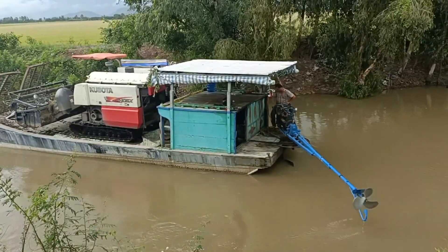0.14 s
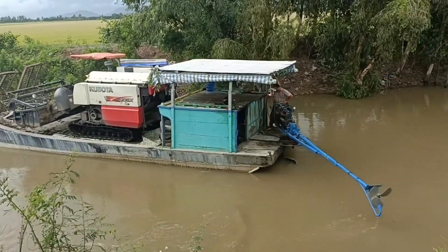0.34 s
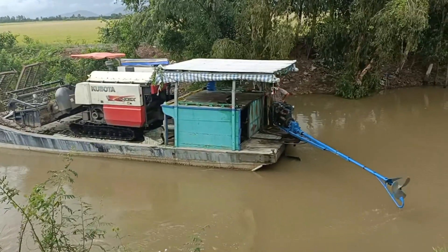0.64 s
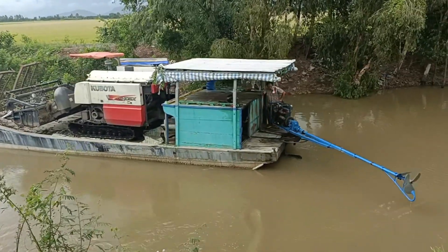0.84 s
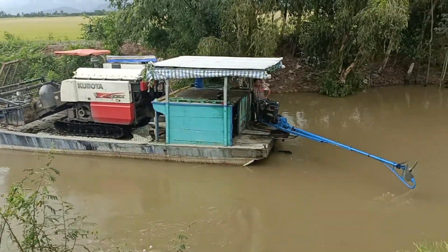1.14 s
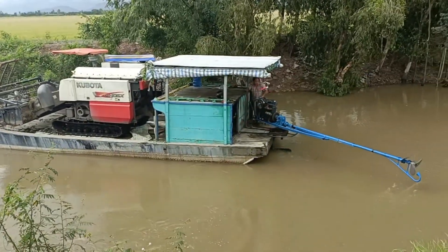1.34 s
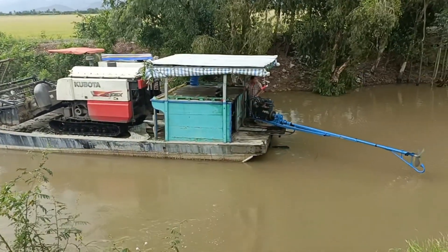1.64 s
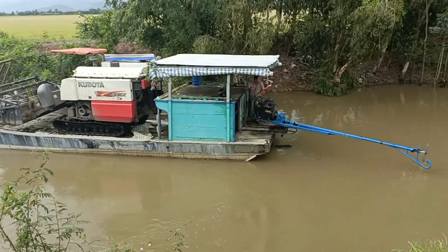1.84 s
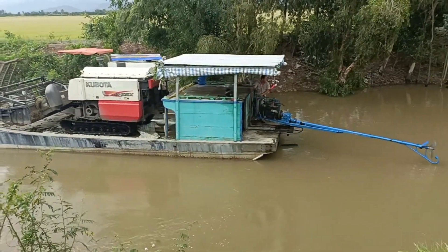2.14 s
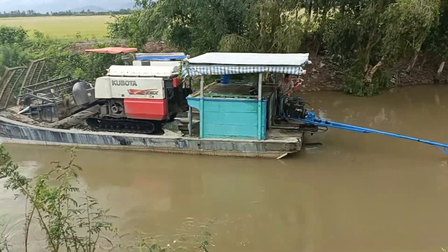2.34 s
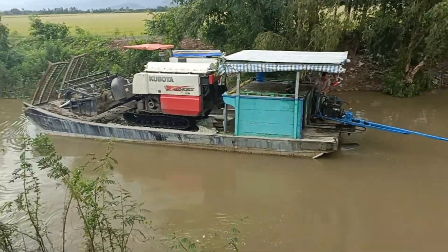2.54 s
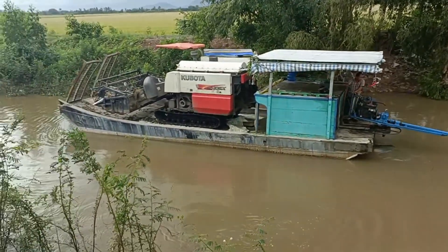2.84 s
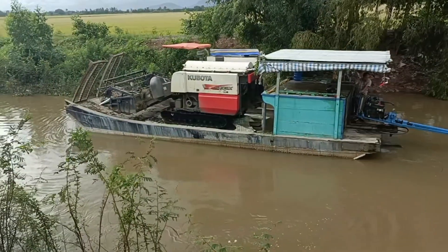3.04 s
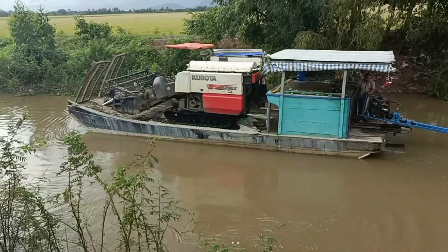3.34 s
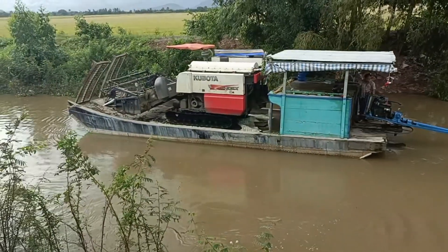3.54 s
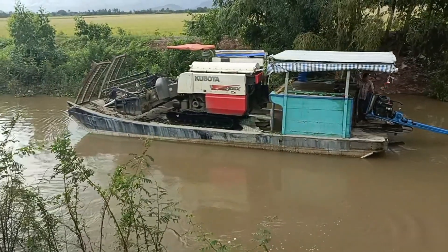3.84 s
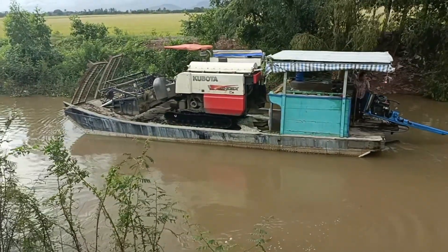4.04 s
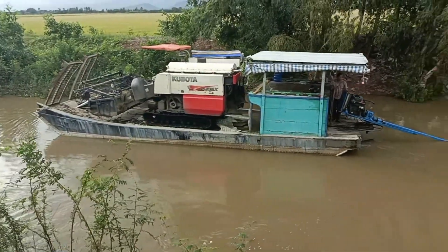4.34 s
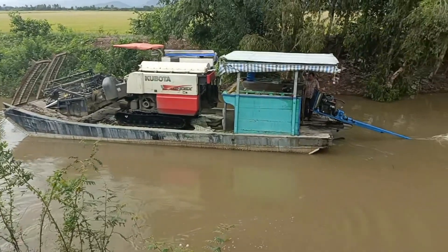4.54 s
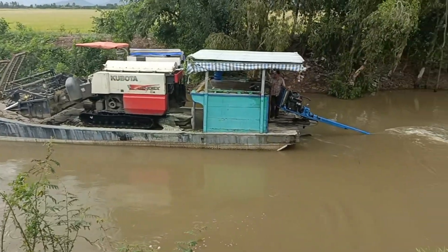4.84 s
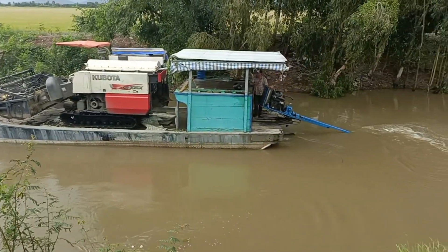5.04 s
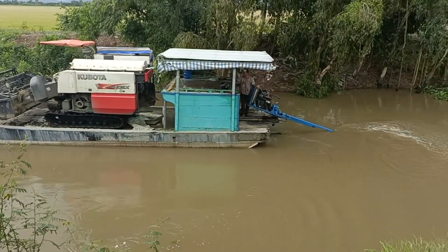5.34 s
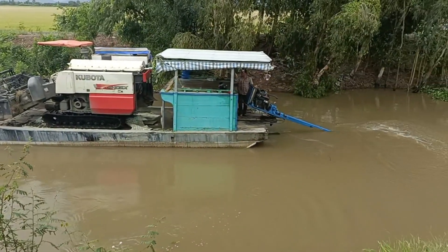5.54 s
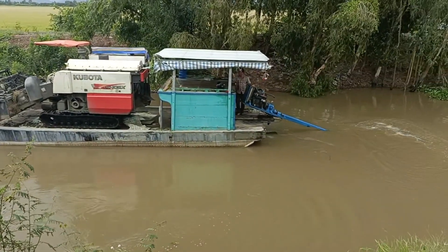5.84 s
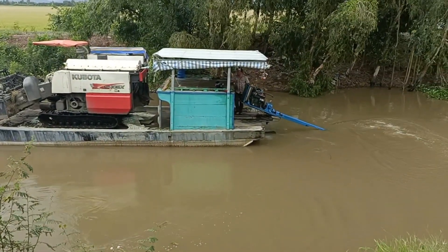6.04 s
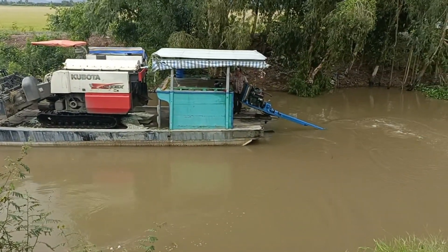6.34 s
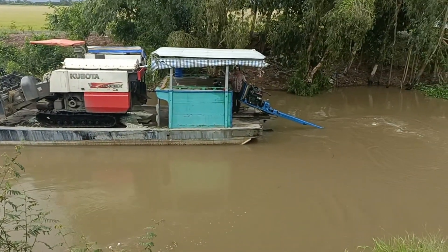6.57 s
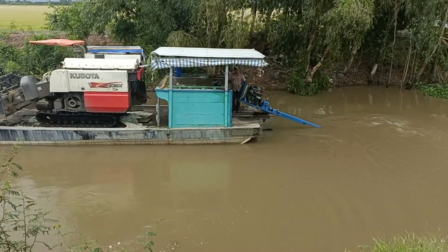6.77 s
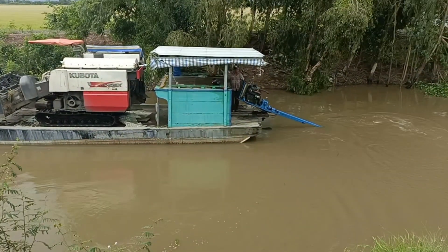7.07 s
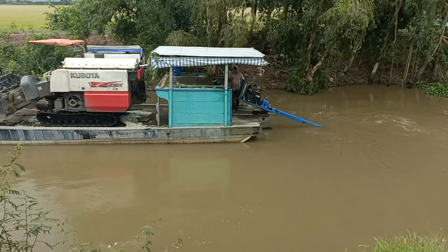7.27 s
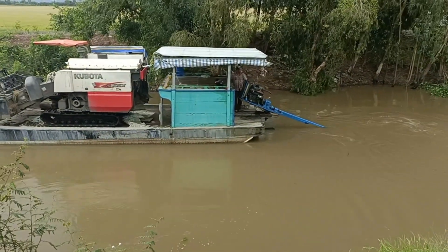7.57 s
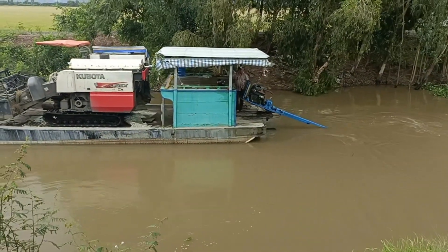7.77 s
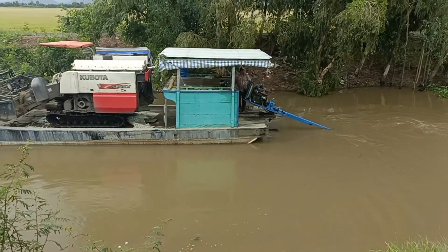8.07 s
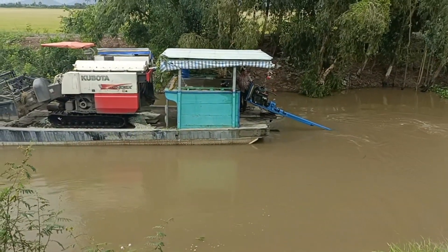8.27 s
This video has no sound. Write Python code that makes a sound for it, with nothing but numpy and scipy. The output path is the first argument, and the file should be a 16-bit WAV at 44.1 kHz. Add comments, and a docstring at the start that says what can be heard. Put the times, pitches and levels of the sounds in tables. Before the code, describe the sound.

From the start, low wind rumble and roar buffet the microphone on a canal bank, far heavier on the right. Beneath it a single-cylinder boat motor clatters at nearly forty firings a second, dropping by 0.6 s to about twenty-seven and sagging slowly to twenty-two near 4.4 s. Short bouts of loose steel clanks, each a few milliseconds of chattering, jangling contact, recur every 0.3 to 0.5 s. Dry swivel rasps over a hollow groan come at 2.0 to 2.8 s, then at 4.85 and 7.0 s. From 4 s the clanks are harder and brighter. Wind puffs slap at about 3.2, 3.5, 4.1, 4.9 and 7.2 s. Wind eases from 5.9 s, surges around 7.3 to 7.7 s, then drops. The engine speeds up from 7 s, peaking near 7.8 s amid the strongest clanking, and clatters on to 8.4 s. Leaves hiss faintly; the banks add short echoes.

```python
"""A rapid engine clatter with bouts of steel clanks: a long-tail motor pushes a barge along a windy canal.
The single cylinder fires 22 to 39 times a second: each firing swells shaped noise and rings the casing.
Loose steel on the mount clanks once a firing within a bout, as chattering noise through damped modes.
The swivel grates as the shaft swings round: short rasps of noise over a hollow groan.
Turbulence buffets two microphone ports on the bank, mostly the right; slaps and leaf hiss fill in."""
import sys
import numpy as np
from scipy import signal
from scipy.fft import rfft, irfft, next_fast_len
from scipy.io import wavfile
from scipy.ndimage import uniform_filter1d

SR = 44100
rng = np.random.default_rng(int(sys.argv[2]) if len(sys.argv) > 2 else 0)


def persist_wave(psi):
    """Save psi, clipped to +-1, as 16-bit WAV."""
    counts = np.round(np.clip(psi, -1, 1) * 32767).astype(np.int16)
    wavfile.write(sys.argv[1], SR, np.atleast_2d(counts).T)


N = 370881
TIME = np.arange(N) / SR  # s


# Engine speed: t/s, firing rate/Hz
ENGINE_SPEED = [(0, 38.6), (.23, 38), (.6, 27.5), (.9, 26.3), (2.8, 25.8), (3.2, 24), (3.6, 23),
                (4.4, 22.3), (4.85, 23), (5.5, 23.8), (5.95, 22.4), (6.85, 23.3), (7.02, 26.5),
                (7.35, 26.2), (7.63, 28.6), (7.81, 35.5), (8.13, 31.8), (8.41, 31.7)]


def firings():
    """Engine speed in firings per second, and its running sum: the count of firings so far."""
    speed, = curves(ENGINE_SPEED)
    return speed, np.cumsum(speed) / SR


# Running clatter of the engine before its swells: t/s, level/dB
RUNNING_LEVEL = [(0, -35.5), (.75, -34.5), (.84, -28.5), (1.85, -28.5), (2.07, -23), (2.79, -29),
                 (2.94, -33.5), (3.9, -32.5), (4.02, -28.5), (4.55, -30), (4.8, -27.5), (5.61, -26.5),
                 (5.9, -33.5), (6.35, -30.5), (6.78, -33.5), (7.7, -30.5), (8.41, -35.5)]


def shaking(swell_db=2.5, swell_s=0.077):
    """Running level in dB: the shaking swells around every bout of clanks and eases between them."""
    swells = [np.exp(-((TIME - bout[0]) / swell_s) ** 2) for bout in CLANK_BOUTS]
    return curves(RUNNING_LEVEL)[0] + swell_db * (np.max(swells, axis=0) - .5)


# Spectrum of the clatter: f/Hz, level/dB
CLATTER_SPECTRUM = [(40, -13), (70, 21), (130, -4.5), (280, 7), (650, -0.5), (1050, 5.5), (1300, -4.5),
                    (1600, -2), (2350, -4.5), (2900, -9), (5000, -7.5), (7300, -14.5), (9000, -27),
                    (15000, -29)]
# Modes of the engine casing: f/Hz, width/Hz, left level/dB, right level/dB
CASING_RINGS = [(1034, 110, 16, 0), (2300, 390, 20, 12), (3120, 110, 10, -62), (4750, 50, 5, -2)]


def engine(clatter_db=-1, tick=0.59, tick_turns=0.12, tick_at=0.23, likeness=0.37, casing_db=-6,
           casing_db_per_hz=0.76, turning_db_per_s=0.76, waver_db=1):
    """Valve gear and exhaust clatter all the time as noise, with a sharp swell at every firing."""
    speed, turns = firings()
    level_db = shaking() + waver_db * wander(60)
    from_firing = (turns - tick_at + .5) % 1 - .5
    strength = rng.uniform(.5, 1.5, 1000)[np.round(turns).astype(int)]
    pulses = 1 + tick * strength * np.exp(-(from_firing / tick_turns) ** 2)
    force = evened(pulses) * amp(level_db)
    clatter = coloured(noise_pair(likeness) * force, CLATTER_SPECTRUM)
    clatter = at_level(clatter, force) * amp([[4.5], [2.5]])
    # the casing rings harder at speed, and as the stern turns towards the bank
    faster_db = casing_db_per_hz * (speed - np.mean(speed))
    turning_db = turning_db_per_s * (TIME - np.mean(TIME))
    shake = force * amp(faster_db + turning_db)
    casing = at_level(ring(shake * rng.standard_normal(N), CASING_RINGS), shake)
    return amp(clatter_db) * clatter + amp(casing_db) * casing


# Bouts of clanking, one clank to a firing: t/s of the hardest clank, level/dB,
# build-up/firings, die-away/firings, low ring over the clash/dB
CLANK_BOUTS = [(.248, -28, 1.55, .4, 3), (0.603, -29.5, 1.7, 0.6, 0), (0.921, -26, 2, .55, -2),
               (1.278, -26.5, 1.3, 2, 1), (1.671, -23, 1.2, 0.99, -1.5), (2.397, -28, 1.6, 2.9, -14),
               (2.804, -20, 0.84, 0.86, -9), (3.186, -26, 1.2, 1.6, -28), (3.659, -23.5, 2.35, 0.53, -28),
               (4.027, -17, 1.52, 1.44, -6), (4.375, -18, 0.77, 1.5, -4), (4.753, -20.5, 1.56, 1.6, -0.5),
               (4.927, -22.5, 1.6, 1.15, -2), (5.272, -20, 2.15, 1.24, 0), (5.571, -20.5, 1.93, 1.84, 4),
               (5.927, -22, 1, 1.83, -3), (6.332, -21.5, 1.57, 0.8, -0.5), (6.44, -27.5, .4, 0.85, -6),
               (6.538, -20.5, 0.32, 0.41, -14), (6.691, -26.5, 2.5, 0.84, -0.5),
               (6.988, -16.5, 2.76, 2.1, -4), (7.448, -18, 3, 2.14, -3), (7.756, -14, 3.32, 3.2, -2),
               (8.112, -20.5, 1.65, 0.81, 4), (8.239, -23, 1.8, 1.7, -4), (8.398, -14.5, 1.88, 1.1, -3.5)]


def clank_blows(count=5, edge_db=-5.5, power=2.73, clank_scatter_db=2, ring_scatter_db=2.5):
    """Loose steel strikes once a firing, hardest mid-bout: rows of t/s, level/dB, low ring/dB."""
    _, turns = firings()
    steps = np.arange(-count, count + 1)  # firings away from the hardest clank
    blows = []
    for s, peak_db, build, fade, low_db in CLANK_BOUTS:
        times = np.interp(np.interp(s, TIME, turns) + steps, turns, TIME)
        # at a reach of 1 the bout is down by edge_db, and it keeps falling beyond
        reach = abs(steps) / np.where(steps < 0, build, fade)
        luck, ring_luck = rng.standard_normal((2, len(steps)))
        level_db = peak_db + edge_db * reach ** power + clank_scatter_db * luck
        blows.extend(np.transpose([times, level_db, low_db + ring_scatter_db * ring_luck]))
    return np.array(blows)


def struck_noise(order=2048, ripple_db=4.5, ripple_hz=330, likeness=0.29):
    """Contact noise in two channels, coloured by the spot that this one blow happens to hit."""
    hz = np.fft.rfftfreq(order, 1 / SR)
    bumps = np.clip(rng.standard_normal(400), -2, 2)
    ripple = np.interp(hz / ripple_hz, np.arange(400), bumps)
    return irfft(rfft(noise_pair(likeness, order)) * evened(amp(ripple_db * ripple)))


# Broad clash of a clank: f/Hz, left level/dB, right level/dB
CLASH_SPECTRUM = [(900, -37, -4), (1600, -0.5, 0), (2230, 1, 6), (2920, 11, -6), (3110, 12.5, -38),
                  (3920, 4, 12), (4370, -2, -19), (5280, 4.5, -2), (6250, -21, -49), (6740, -18, -3),
                  (10000, -7.5, -7.5), (12700, -5, -6.5), (15900, -13, -26)]
# Loose parts, low steel and a small bright part: f/Hz, width/Hz, left level/dB, right level/dB
PART_RINGS = [(2632, 38, 2.5, -8), (3157, 43, -3, -3), (3760, 110, 4.5, 4), (4195, 73, -3, -8),
              (4550, 140, -1, -2.5), (4860, 61, -8, -1), (5180, 150, -18, 0), (5400, 110, -20, -6),
              (6050, 150, -3.5, -19), (6520, 110, -4, -19)]
LOW_RINGS = [(2320, 117, -16, -14)]
HIGH_RINGS = [(6940, 290, -2, -32), (7420, 1060, 16.5, 0), (8500, 290, -6, -5.5)]
# How loosely the small bright part sits, as its ring in a clank: t/s, level/dB
BRIGHT_LOOSENESS = [(0, -31.5), (1.7, -34), (3.2, -23.5), (4.4, -28.5), (5.2, -30.5), (6.9, -29.5),
                    (7.8, -34.5), (8.1, -27), (8.4, -36)]


def clanks(rise_s=0.00094, chatter_s=0.0081, fall_s=0.0032, lead_s=0.00039, ring_lead_s=0.001, clash_db=1,
           parts_db=1, low_db=1.0, high_db=2, high_follow=0.64, usual_db=-23.5):
    """Each clank is a few milliseconds of chattering contact: a broad clash plus ringing modes."""
    clash, low, high = np.zeros((3, N))
    contacts = np.zeros((2, N))
    parts = np.zeros((len(PART_RINGS), N))
    blows = clank_blows()
    mixes = rng.exponential(1, (len(blows), len(PART_RINGS)))  # every clank strikes the parts differently
    loose_db, = curves(BRIGHT_LOOSENESS)

    def contact(t):
        """Smooth onset and release of the chatter."""
        return 1 / (1 + np.exp(-t / rise_s)) / (1 + np.exp((t - chatter_s) / fall_s))

    def sing(force, modes):
        """Modes fed evenly by the chatter, so that the ring follows the force of the blow."""
        grain = steadied(ring(rng.standard_normal(N), modes).sum(0), 0.0053)
        return at_level(ring(force * grain, modes), force)

    for (s, db, low_over_db), mix in zip(blows, mixes):
        if s >= TIME[-1]:
            continue
        near = slice(int((s - .01) * SR), int((s + .035) * SR))
        t = TIME[near] - s + lead_s
        press = amp(db) * contact(t)
        blow = contact(t + ring_lead_s)
        clash[near] += press
        contacts[:, near] += press * struck_noise()[:, :len(t)]
        parts[:, near] += amp(db) * evened(mix)[:, None] * blow
        low[near] += amp(db + low_over_db) * blow
        # the small part follows its seating, and only partly the blow
        high[near] += amp(loose_db[near] + high_follow * (db - usual_db)) * blow
    broad = at_level(coloured(contacts, CLASH_SPECTRUM), clash)
    rings = [ring(force * rng.standard_normal(N), [mode]) for force, mode in zip(parts, PART_RINGS)]
    jangle = at_level(sum(rings), clash)
    struck = amp(clash_db) * broad + amp(parts_db) * jangle
    return struck + amp(low_db) * sing(low, LOW_RINGS) + amp(high_db) * sing(high, HIGH_RINGS)


def light_rattle(rattle_db=-5, spread_db=4, rattle_at=0.19, rattle_turns=0.073):
    """Beneath the loud clanks, every firing jogs the loose parts a little and rings their modes."""
    turns = firings()[1] - rattle_at
    firing = np.round(turns).astype(int)
    jog = np.exp(-((turns - firing) / rattle_turns) ** 2) * amp(shaking())
    modes = [*LOW_RINGS, *PART_RINGS]
    luck = np.clip(rng.standard_normal((len(modes), firing.max() + 2)), -2, 2)
    sizes = amp(spread_db * luck)  # one per mode and firing
    rattle = sum(ring(jog * size[firing] * rng.standard_normal(N), [mode]) for size, mode in zip(sizes, modes))
    return amp(rattle_db) * at_level(rattle, jog)


# Grates of the swivel: t/s at the middle, level/dB, length/s
SWIVEL_GRATES = [(2.036, -20, 0.021), (2.182, -22, 0.031), (2.276, -17, 0.019), (2.684, -17, 0.012),
                 (2.755, -21, 0.032), (4.853, -21.5, 0.046), (6.979, -22.5, 0.023)]


def swivel(grate_db=0, grain_db=2, groan_db=-7, groan_hz=820, groan_width_hz=130, groan_stretch=3):
    """Dry steel slips: short grainy rasps over a longer hollow groan."""
    def strokes(stretch):
        return sum(amp(db) * np.exp(-(2 * (TIME - s) / (stretch * length)) ** 2)
                   for s, db, length in SWIVEL_GRATES)

    force, strain = strokes(1), strokes(groan_stretch)
    slips = force * amp(grain_db * wander(800)) * noise_pair(0.2)
    # f/Hz, level/dB
    rasp = coloured(slips, [(500, -53), (1800, 8), (3000, 3.0), (5000, 4), (8000, -5.5), (10000, -13.5),
                            (15000, -22)])
    groan = ring(strain * rng.standard_normal(N), [(groan_hz, groan_width_hz, 0, -3)])
    return amp(grate_db) * at_level(rasp, force) + amp(groan_db) * at_level(groan, strain)


def banks(x, wet_db=-9, t60=0.25, delay_s=0.0042):
    """Hull, cabin and wooded banks scatter a short tail of sparse, decaying echoes."""
    t = np.arange(SR // 3) / SR
    taps = rng.standard_normal((2, len(t))) * (rng.random((2, len(t))) < .1)
    tail = taps * amp(-60 * t / t60) * np.clip(t / delay_s - .5, 0, 1)
    tail /= np.linalg.norm(tail, axis=1, keepdims=True)
    return x + amp(wet_db) * signal.fftconvolve(x, tail, axes=1)[:, :N]


# Phase between the two ports for sound from the boat: f/Hz, lead of the left/rad
PORT_LEAD = [(2450, 0.4), (3400, -2), (4500, -1.5), (7200, -6), (9000, -4), (16000, -8.5)]


def ports(x):
    """Sound from the boat bends round the microphone body, shifting phase between the ports by frequency."""
    size = next_fast_len(N + 1000)
    lead = np.interp(np.fft.rfftfreq(size, 1 / SR), *np.transpose(PORT_LEAD))
    return irfft(rfft(x, size) * np.exp(.5j * np.array([lead, -lead])), size)[:, :N]


# Slow breeze on the sheltered left port and the windward right port: t/s, level/dB
LEFT_BREEZE = [(0, -33.5), (.7, -25), (.85, -19), (1.25, -21.5), (1.7, -17), (2.42, -15.5), (2.65, -22),
               (3.84, -24.5), (4, -16), (4.38, -19.5), (4.62, -29), (4.9, -21), (5.55, -21), (6.3, -37),
               (7.5, -26), (8.41, -29.5)]
RIGHT_BREEZE = [(0, -8), (.3, -10), (.75, -6), (2.45, -8.5), (2.6, -11.5), (3.15, -8), (3.55, -10),
                (3.95, -6.5), (5.7, -8.5), (5.9, -16), (6.42, -13), (6.65, -20.5), (7.05, -19),
                (7.35, -8.5), (7.72, -10.5), (8, -25.5), (8.41, -17.5)]
# Brief gusts and lulls on top: t/s at the middle, half length/s, left change/dB, right change/dB
BRIEF_GUSTS = [(0.179, .035, 12, -0.5), (0.423, 0.096, 12.5, -2), (0.65, .03, -3, -6),
               (2.738, 0.052, 1, -6.5), (3.78, 0.039, -9, -12), (6.135, .03, 24.5, 2.5),
               (6.763, 0.023, -3, -11), (6.959, 0.026, 5, 8.5), (7.22, 0.036, 4, 7), (7.5, 0.051, 0, -5),
               (7.603, 0.057, 5, 2.5), (8.273, 0.036, 21, 1)]


def breeze():
    """Wind level in dB at the left and right port: the slow breeze plus its gusts and lulls."""
    slow = np.array(curves(LEFT_BREEZE) + curves(RIGHT_BREEZE))
    return slow + sum(np.array([[left_db], [right_db]]) * np.exp(-((TIME - s) / length) ** 2)
                      for s, length, left_db, right_db in BRIEF_GUSTS)


# Spectrum of the buffeting: f/Hz, left level/dB, right level/dB
BUFFET_SPECTRUM = [(15, -37, -32), (35, -7, -33), (65, -7, -15), (103, 3.5, -5.5), (183, -5.5, -5),
                   (283.4, -2.5, 4.5), (385, -13.5, -5.5), (753, -24, -25), (1140, -29, -34),
                   (4850, -59, -119)]
# Eddies at the windward port, relative to the body of the wind: t/s, rumble level/dB, roar level/dB
EDDY_SIZES = [(0, -11, -11), (.57, -8, -18), (.75, -4.5, -1.5), (1.15, -11, -6), (2.4, 1.5, -5.5),
              (2.62, 0.5, -12.5), (3.5, -6.5, -9.5), (4.35, 0.5, -11.5), (5.2, -11.5, -9), (5.7, -7.5, -10),
              (6.55, 1.5, -13.5), (7.3, -6.5, -10), (8.41, -3, -13)]


def wind(rumble_hz=170, roar_hz=400, left_db=1.0, right_db=0, lump_db=2.0, body_lump_db=3.5,
         roar_lump_db=3.0, steady_s=.035, gust_roar=0.56, lump_more_db=1.0, lump_more_per_db=0.1461,
         full_db=-7):
    """Unrelated turbulence at each port; at the windward one it shifts between rumble and roar."""
    left, right = coloured(rng.standard_normal((2, N)), BUFFET_SPECTRUM)
    rumble_db, roar_db = curves(EDDY_SIZES)
    rumble = signal.sosfiltfilt(signal.butter(6, rumble_hz, fs=SR, output="sos"), right)
    roar = signal.sosfiltfilt(signal.butter(6, roar_hz, "high", fs=SR, output="sos"), right)
    lee_db, gust_db = breeze()
    # quieter wind is lumpier, loud wind is held flatter by the microphone's limiting
    lump_more = lump_more_db + lump_more_per_db * np.maximum(full_db - gust_db, 0)
    gust_db = gust_db + lump_more * wander(22)
    # a gust that stands out from the half second around it is brighter too
    roar_db = roar_db + gust_roar * (gust_db - uniform_filter1d(gust_db, SR // 2))
    # body and roar come and go on their own
    body = evened((right - rumble - roar) * amp(body_lump_db * wander(18)))
    roar = evened(roar * amp(roar_lump_db * wander(35)))
    right = body + amp(rumble_db) * evened(rumble) + amp(roar_db) * roar
    lee = steadied(left, 0.027) * amp(lee_db + left_db + lump_db * wander(25))
    windward = steadied(right, steady_s) * amp(gust_db + right_db)
    return np.array([lee, windward])


# Sharp gusts that slap a port: t/s, left level/dB, right level/dB
PORT_SLAPS = [(.42, -30, -50), (3.175, -42, -14), (3.51, -45, -17.5), (4.148, -34, -12.5), (4.88, -24, -16),
              (6.138, -31, -50), (7.245, -47, -18), (7.615, -47.5, -25)]


def slaps(length_s=0.015, slap_db=0):
    """Small fast eddies burst on a port as short puffs, brighter than the steady buffeting."""
    force = sum(amp([[left_db], [right_db]]) * np.exp(-((TIME - s) / length_s) ** 2)
                for s, left_db, right_db in PORT_SLAPS)
    # f/Hz, level/dB
    puff = coloured(rng.standard_normal((2, N)), [(100, -29), (500, 9.5), (900, 3), (1600, -7), (4000, -46)])
    return amp(slap_db) * force * evened(puff)


def leaves(hiss_db=-52):
    """Foliage along the banks hisses faintly: white noise that swells and fades slowly."""
    return amp(hiss_db + wander(3.1)) * rng.standard_normal((2, N))


def ring(force, modes):
    """Damped modes driven by one force, each radiating differently to left and right."""
    out = np.zeros((2, N))
    for hz, width, left_db, right_db in modes:
        r = np.exp(-np.pi * width / SR)  # a wider mode dies away faster
        mode = signal.lfilter([1, 0, -1], [1, -2 * r * np.cos(2 * np.pi * hz / SR), r * r], force)
        out += amp([[left_db], [right_db]]) * evened(mode)
    return out


def noise_pair(likeness, length=N):
    """White noise in two channels that share a part."""
    shared = np.sqrt(likeness) * rng.standard_normal(length)
    return shared + np.sqrt(1 - likeness) * rng.standard_normal((2, length))


def coloured(x, rows):
    """Filters by a spectrum table with one shared column or one for each channel."""
    hz, *columns = np.transpose(rows)
    size = next_fast_len(N)
    log_hz = np.log(np.fft.rfftfreq(size, 1 / SR) + 1)
    gains = amp([np.interp(log_hz, np.log(hz), c) for c in columns])
    return irfft(rfft(x, size) * gains, size)[:, :N]


def wander(per_s):
    """Slow chance of rms 1: random points, per_s of them a second, joined by lines."""
    return evened(np.interp(TIME * per_s, np.arange(8000), rng.standard_normal(8000)))


def curves(rows):
    """Each column of a time table, at every sample."""
    s, *columns = np.transpose(rows)
    return [np.interp(TIME, s, c) for c in columns]


def steadied(x, span_s):
    """Holds the short-time rms near 1."""
    power = uniform_filter1d(x ** 2, max(int(span_s * SR), 3))
    return x / np.sqrt(abs(power) + 1e-12)


def at_level(x, envelope):
    """Gives a sound the rms of its envelope."""
    return evened(x) * np.sqrt(np.mean(envelope ** 2))


def evened(x):
    """Scales to rms 1."""
    return x / np.sqrt(np.mean(x ** 2) + 1e-20)


def amp(db):
    """Decibels to gain."""
    return 10 ** (np.asarray(db) / 20)


def scene():
    """The boat across the water, leaves, and wind at the microphone."""
    steel = banks(clanks() + light_rattle() + swivel())
    boat = ports(steel + engine())
    return boat + leaves() + wind() + slaps()


def record(dry, knee=0.44, edge_hz=15800):
    """Peaks above the knee round off softly under full scale; then a low-pass limits the band."""
    over = np.maximum(abs(dry) - knee, 0)
    room = 1 - knee
    soft = dry - np.sign(dry) * (over - room * np.tanh(over / room))
    lowpass = signal.firwin(511, edge_hz, window=("kaiser", 9), fs=SR)
    return signal.oaconvolve(soft, lowpass[None], "same")


dry = scene()
out = record(dry)
persist_wave(out)
```